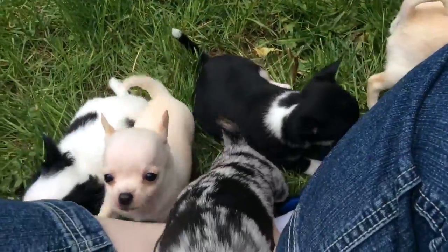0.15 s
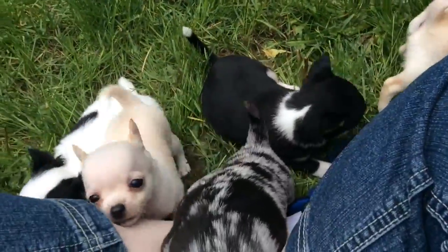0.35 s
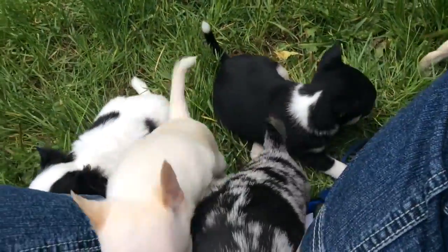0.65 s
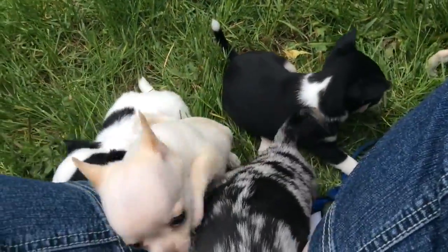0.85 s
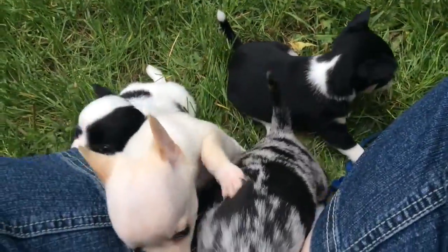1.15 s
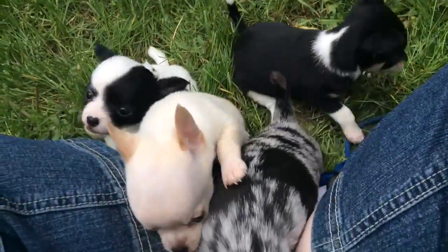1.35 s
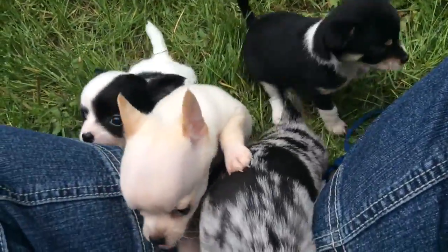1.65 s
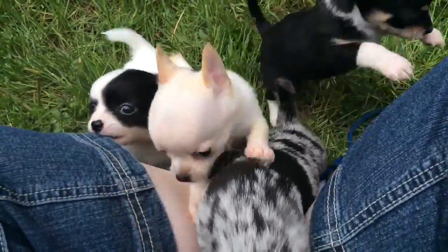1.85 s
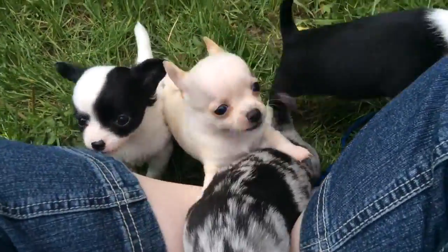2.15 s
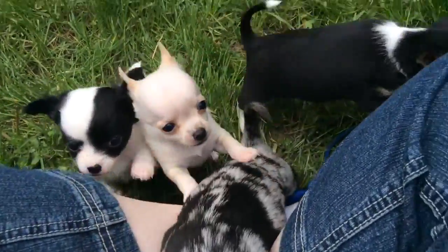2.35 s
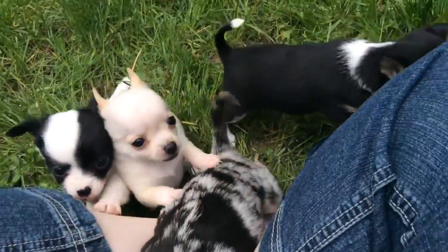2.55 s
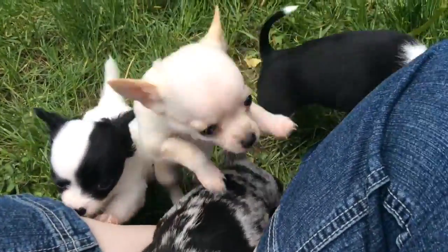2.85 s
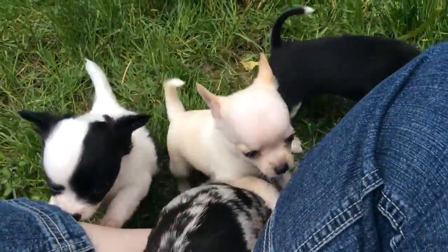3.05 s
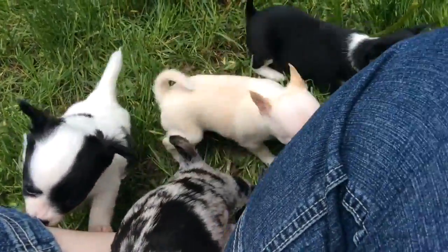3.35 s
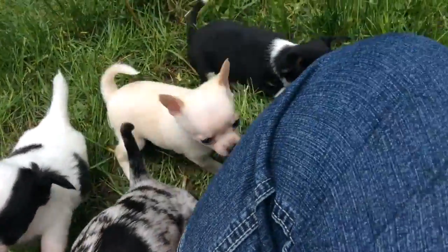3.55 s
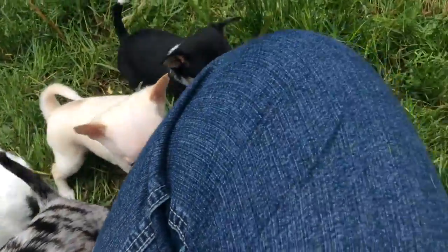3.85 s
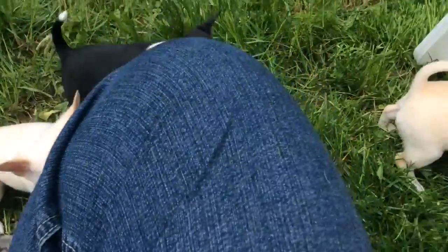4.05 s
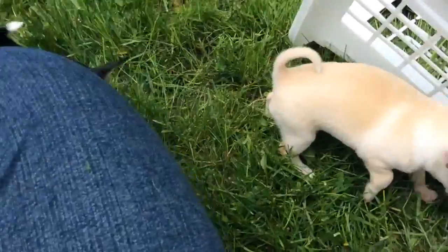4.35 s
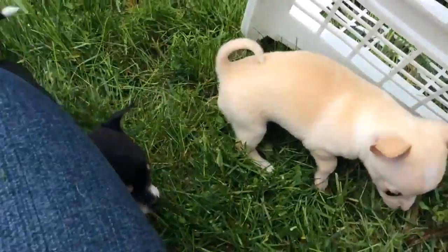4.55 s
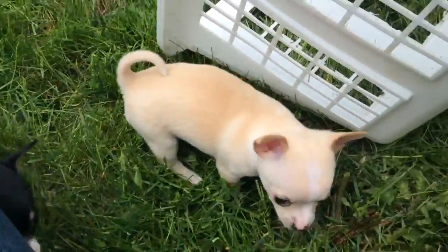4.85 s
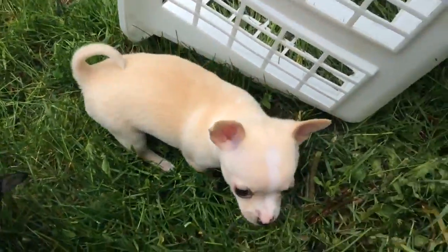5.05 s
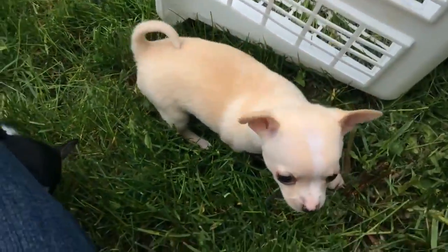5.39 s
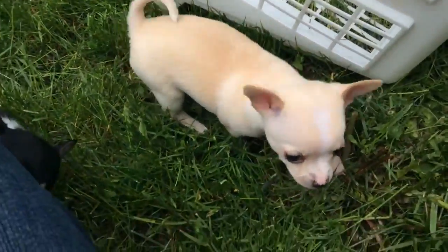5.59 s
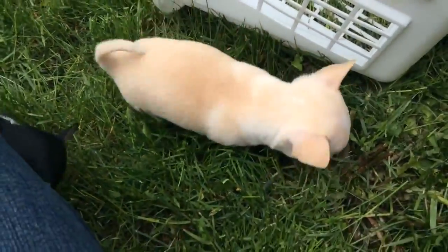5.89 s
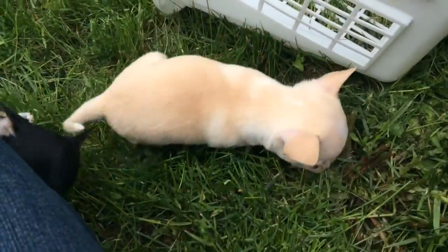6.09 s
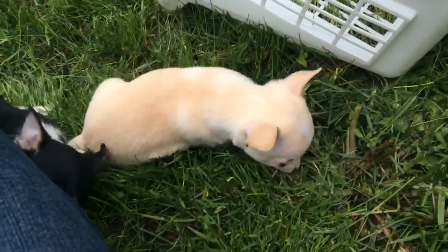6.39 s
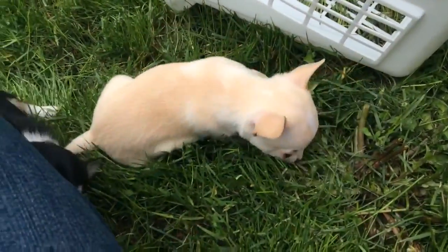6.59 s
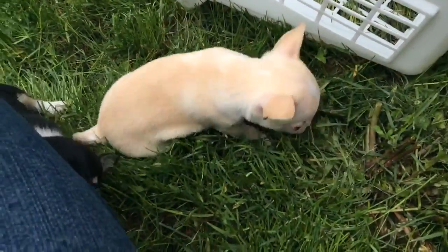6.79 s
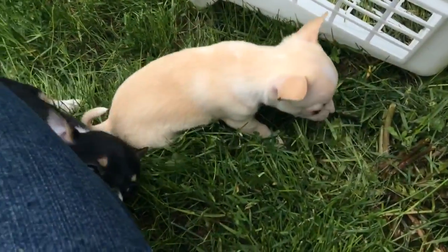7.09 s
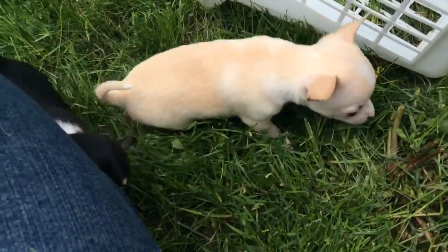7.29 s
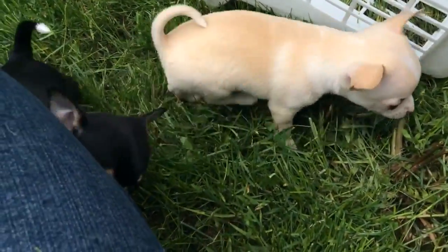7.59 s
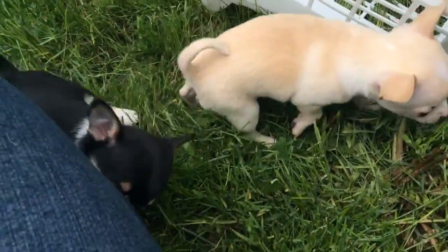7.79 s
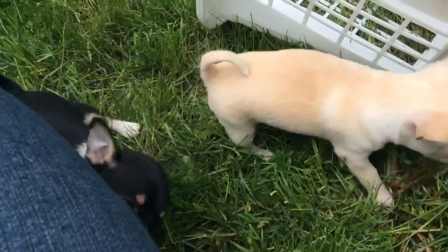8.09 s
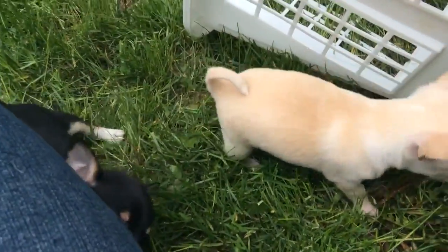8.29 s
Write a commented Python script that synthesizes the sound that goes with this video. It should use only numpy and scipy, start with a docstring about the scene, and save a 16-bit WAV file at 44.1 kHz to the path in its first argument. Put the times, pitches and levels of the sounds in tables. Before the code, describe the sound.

Distant songbirds chirp over a quiet traffic rumble and a faint machine whine while puppies step about in the grass near the microphone. About two seconds in, one gives a brief high yelp, followed by a longer falling yelp with a hoarse ending. After that come only light paw rustles, tiny ticks, faint sniffing, one soft bump and more far birdsong.

```python
"""Small puppies on a lawn, near one microphone: one gives a short rising yelp, then a longer one that
falls and breaks into a croak as its vocal folds beat strong and weak in turn. They sniff and climb
about, paws swishing and claws ticking in the grass, and an insect clicks. Songbirds whistle and trill
from trees a way off; far traffic rumbles under a faint machine whine."""
import sys
import numpy as np
from scipy import signal
from scipy.fft import rfft, irfft, next_fast_len
from scipy.io import wavfile
from scipy.ndimage import uniform_filter1d

SR = 44100
rng = np.random.default_rng(int(sys.argv[2]) if len(sys.argv) > 2 else 0)


def unload_audio(sound):
    """Save the sound as a 16-bit wav file, at the path given as the first command line argument."""
    columns = np.transpose(np.atleast_2d(sound))
    # keep every value between -1 and 1, then stretch to whole-number steps
    steps = np.round(np.clip(columns, -1, 1) * 32767)
    wavfile.write(sys.argv[1], SR, steps.astype(np.int16))


N = 371763
T = np.arange(N) / SR


def amp(db):
    """Decibels to gain."""
    return 10 ** (np.asarray(db) / 20)


def rms_one(x):
    """Scale to unit rms."""
    return x / np.sqrt(np.mean(x ** 2) + 1e-20)


def phase(hz):
    """Running phase of a moving pitch, in radians."""
    return 2 * np.pi * np.cumsum(hz) / SR


def in_time(rows, t=T):
    """Columns of a curve table read at times t."""
    time_s, *columns = np.transpose(rows)
    return [np.interp(t, time_s, column) for column in columns]


def at_hz(spectrum, hz):
    """A spectrum's level in dB, read on a log-frequency axis."""
    points_hz, level_db = np.transpose(spectrum)
    return np.interp(np.log(hz + 1), np.log(points_hz), level_db)


def window(start, end, fade_s=0.0014):
    """Sample range of a stretch and its soft-edged gate."""
    at = np.arange(int(start * SR), min(int(end * SR), N))
    return at, np.clip(np.minimum(T[at] - start, end - T[at]) / fade_s, 0, 1)


def drift(rate_hz):
    """Smooth random wander with a spread of 1."""
    hop = 40
    r = np.exp(-2 * np.pi * rate_hz * hop / SR)
    slow = signal.lfilter([1], [1, -2 * r, r * r], rng.standard_normal(N // hop + 2002))[2000:]
    return np.interp(np.arange(N) / hop, np.arange(len(slow)), rms_one(slow))


def coloured(x, spectrum):
    """A signal shaped to a spectrum, rms 1."""
    size = next_fast_len(N)
    gain = amp(at_hz(spectrum, np.arange(size // 2 + 1) * SR / size))
    return rms_one(irfft(rfft(x, size) * gain, size)[:N])


def resonance(x, hz, width_hz):
    """Two-pole peak with gain 1 on top."""
    r = np.exp(-np.pi * width_hz / SR)
    poles = [1, -2 * r * np.cos(2 * np.pi * hz / SR), r * r]
    return signal.lfilter(np.array([1, 0, -1]) * (1 - r * r) / 2, poles, x)


def narrow_noise(hz, width_hz):
    """Noise passed twice through one resonance, rms 1."""
    return rms_one(resonance(resonance(rng.standard_normal(N), hz, width_hz), hz, width_hz))


def swells(rows, rise_s, fall_s):
    """Gain curves, one a level column: a soft rise to each event's peak and a dying fall."""
    peak_s, *columns = np.transpose(rows)
    t = T[::50]
    late = t[:, None] - peak_s
    shape = np.exp(-np.where(late < 0, (late / rise_s) ** 2, late / fall_s))
    return [np.interp(T, t, shape @ amp(db)) for db in columns]


def open_air(level_db=-66.5):
    """A broad outdoor hiss behind everything."""
    # colour of the hiss: frequency_hz, level_db
    spectrum = [(150, -15.5), (250, -2), (449, -14.5), (690, -7.5), (792, -10), (1180, -12), (1240, -11),
                (1420, -13), (1780, -17), (3300, -20), (7170, -27.5), (8370, -23.5), (15300, -42.5)]
    return amp(level_db + .5 * drift(4.3)) * coloured(rng.standard_normal(N), spectrum)


def far_traffic():
    """A slowly swelling rumble with the hum of a far engine's low orders."""
    # swell of the rumble: time_s, level_db
    swell = [(0, -59.5), (2.1, -58), (3.0, -57), (3.78, -54), (4.08, -60.5), (4.41, -54), (4.67, -64),
             (4.95, -58.5), (5.4, -57), (5.7, -56), (6.2, -56), (7.84, -55), (8.43, -57)]
    # colour of the rumble: frequency_hz, level_db
    spectrum = [(11, -56), (18, -23.5), (53, -2.5), (83, 0), (118, -0.5), (147, -5.5), (184, -11.5),
                (217, -6), (243, -18), (343, -15), (500, -25.5), (650, -68), (1100, -120)]
    # engine orders: pitch_hz, width_hz, level_db
    hums = [(68.8, 16.7, -62.5), (142.4, 16.3, -69.5)]
    out = amp(in_time(swell)[0] + 0.61 * drift(6.0)) * coloured(rng.standard_normal(N), spectrum)
    for hz, width_hz, db in hums:
        out += amp(db) * rms_one(resonance(rng.standard_normal(N), hz, width_hz))
    return out


def machine_whine(idle_db=-88):
    """A distant machine's two narrow whines surge and never quite stop."""
    # lower and upper whine: pitch_hz, width_hz
    whines = [(1162, 28), (1430, 180)]
    # surges: peak_s, lower_db, upper_db
    surges = [(.28, -75, -88), (1.07, -75, -97), (1.74, -74, -82.5), (2.38, -73, -79), (2.95, -67, -75),
              (3.72, -72.5, -72), (4.45, -77, -71), (4.85, -98, -81), (5.2, -74, -75), (5.7, -78, -86),
              (5.95, -79, -77), (6.63, -70, -76), (7.45, -72, -76), (7.9, -81, -77), (8.35, -76, -69)]
    out = np.zeros(N)
    for (hz, width_hz), surge in zip(whines, swells(surges, rise_s=.17, fall_s=.15)):
        out += (surge + amp(idle_db)) * amp(1.4 * drift(7.3)) * narrow_noise(hz, width_hz)
    return out


def far_moan():
    """A short wavering tone from far off."""
    # course of the tone: time_s, pitch_hz, level_db
    course = [(1.3, 680, -87), (1.35, 680, -72), (1.574, 689, -74), (1.62, 700, -80)]
    at, gate = window(course[0][0], course[-1][0], fade_s=.02)
    hz, db = in_time(course, T[at])
    out = np.zeros(N)
    out[at] = gate * np.sqrt(2) * amp(db) * np.sin(phase(hz * (1 + 0.018 * drift(31)[at])))
    return out


def far_chorus():
    """The whistles of many distant small birds merge into flickering narrow noise."""
    # strength of the chorus: time_s, level_db
    strength = [(5.4, -84), (7.0, -85), (8.15, -83)]
    at, gate = window(strength[0][0], strength[-1][0], fade_s=0.076)
    level_db = in_time(strength, T[at])[0] + 2.5 * drift(13)[at]
    out = np.zeros(N)
    out[at] = gate * amp(level_db) * narrow_noise(3360, width_hz=290)[at]
    return out


def whistles(notes, depth_hz, warble_hz=70.5):
    """Each bird note glides through three pitches, swells and fades, with a quick warble."""
    out, waver = np.zeros(N), 0.85 * drift(41.6)
    for start, end, first_hz, middle_hz, last_hz, db in notes:
        at, gate = window(start, end, fade_s=0.0029)
        progress = (T[at] - start) / (end - start)
        glide_hz = np.interp(progress, [0, .5, 1], [first_hz, middle_hz, last_hz])
        warble = np.sin(2 * np.pi * warble_hz * T[at]) + waver[at]
        swell_db = np.interp(progress, [0, 0.38, 1], [-4.5, 0, -3])
        out[at] += gate * np.sqrt(2) * amp(db + swell_db) * np.sin(phase(glide_hz + depth_hz * warble))
    return out


def trills(rate_hz=114.3):
    """A bird's whistle swept up and down so fast that it buzzes."""
    # buzzy calls: start_s, end_s, first_hz, last_hz, depth_hz, level_db
    calls = [(0.388, 0.546, 3890, 4520, 690, -66), (.64, 0.708, 2990, 2850, 500, -62.5),
             (0.7, 0.876, 5400, 6200, 1000, -73), (1.705, 1.838, 4090, 4520, 500, -72),
             (1.95, 2.064, 3700, 3346, 570, -59.5), (3.203, 3.394, 3066, 3570, 795, -65.5),
             (4.079, 4.329, 3224, 3266, 510, -68.5), (4.943, 5.205, 4020, 4260, 597, -67),
             (5.222, 5.335, 3300, 3140, 696, -66), (8.18, 8.288, 4250, 4280, 250, -69),
             (8.201, 8.342, 3070, 3150, 220, -64.5), (8.319, 8.412, 2980, 2640, 350, -64.5),
             (1.858, 1.96, 2620, 2530, 220, -67)]
    out, sweep = np.zeros(N), np.sin(phase(rate_hz * (1 + .25 * drift(40))))
    for start, end, first_hz, last_hz, depth_hz, db in calls:
        at, gate = window(start, end, fade_s=0.018)
        hz = np.linspace(first_hz, last_hz, len(at)) + depth_hz * sweep[at]
        out[at] += gate * amp(db) * np.sin(phase(hz))
    return out


def songbirds(trees_t60_s=0.7, trees_db=-2.5):
    """Whistles and trills from a way off, smeared by scattering among the trees."""
    # whistled notes: start_s, end_s, first_hz, middle_hz, last_hz, level_db
    song = [(.2, .27, 3700, 3840, 3820, -76.5), (.33, .36, 3620, 3630, 3500, -70.5),
            (.375, .44, 3340, 3570, 4080, -66), (.51, .6, 2720, 2515, 2650, -68.5),
            (.6, .64, 2750, 3300, 3560, -59), (.64, .7, 3515, 3480, 3500, -61.5),
            (.725, .8, 3500, 2630, 2450, -63.5), (.81, .87, 2570, 2640, 2630, -70),
            (1.7, 1.78, 3730, 4450, 4460, -74), (1.79, 1.94, 2840, 2780, 2570, -68.5),
            (1.95, 1.995, 4190, 3720, 3530, -61), (2.01, 2.06, 3820, 3640, 3440, -67),
            (4.06, 4.15, 2950, 3680, 3070, -67.5), (4.169, 4.185, 3100, 3030, 2900, -53.5),
            (4.89, 4.94, 3580, 3540, 3500, -64), (4.945, 4.98, 4800, 4650, 4340, -64.5),
            (5.0, 5.04, 3860, 3850, 3770, -67), (5.036, 5.09, 3740, 3650, 3660, -62),
            (5.105, 5.15, 4900, 4640, 4370, -70), (5.155, 5.2, 2740, 2550, 2440, -61.5),
            (5.205, 5.228, 2500, 2700, 3250, -60), (5.238, 5.277, 4130, 4180, 4270, -68),
            (5.28, 5.31, 2650, 2370, 2150, -67.5), (5.32, 5.35, 2930, 2920, 2890, -72),
            (5.55, 5.58, 2020, 2120, 2146, -71), (8.18, 8.21, 3720, 3210, 3000, -67),
            (8.402, 8.418, 3440, 3500, 3800, -54.5), (8.417, 8.43, 4050, 4200, 4260, -65)]
    # a smaller bird's thin falling notes: start_s, end_s, first_hz, middle_hz, last_hz, level_db
    peeps = [(.25, .31, 7430, 6750, 6370, -82), (.38, .48, 7900, 7460, 6240, -75),
             (.54, .66, 8300, 7740, 6150, -74)]
    direct = whistles(song, depth_hz=61.4) + whistles(peeps, depth_hz=17) + trills()
    direct *= amp(2.6 * drift(45))    # moving leaves and air make the level flutter
    lag = T[:SR // 2]
    scatter = rng.standard_normal(len(lag)) * amp(-60 * lag / trees_t60_s) * np.clip(lag / 0.01, 0, 1)
    return direct + amp(trees_db) * signal.fftconvolve(direct, scatter / np.linalg.norm(scatter))[:N]


def insect(clicks_per_s=22.5):
    """A steady train of tiny clicks rings two high resonances."""
    # strength of the ticking: time_s, level_db
    strength = [(4.4, -90.5), (5.9, -81.5), (8.4, -85)]
    # resonances: pitch_hz, width_hz, level_db
    modes = [(10040, 200, -5), (6030, 210, -3)]
    at, gate = window(strength[0][0], strength[-1][0], fade_s=.1)
    count = np.floor(np.cumsum(clicks_per_s * (1 + 0.066 * drift(3.9))) / SR)
    clicks = np.diff(count, prepend=0) * amp(4.8 * drift(30))
    rings = sum(amp(db) * rms_one(resonance(clicks + 1e-18, hz, width_hz)) for hz, width_hz, db in modes)
    out = np.zeros(N)
    out[at] = gate * amp(in_time(strength, T[at])[0]) * rings[at]
    return out


def stalk_snaps(uneven_db, per_s=9000):
    """Grass stalks snap at random in tiny clicks of uneven size."""
    snapping = rng.random(N) < per_s / SR
    size = amp(uneven_db * np.minimum(rng.exponential(1, N), 5.0))
    return snapping * size * rng.choice([-1, 1], N)


def paws_in_grass():
    """Dense snaps of stalks blur into a bright swish and a dull brush that swell at each step."""
    # steady stirring of the grass: time_s, level_db
    rustle = [(0, -87), (1.4, -86.5), (2.1, -82.5), (2.8, -83.5), (3.3, -76), (3.9, -80), (4.5, -77),
              (5.6, -82), (5.95, -79), (6.35, -83), (6.7, -78), (7.05, -84), (7.35, -78), (7.7, -81.5),
              (8.43, -79)]
    # paw strokes: peak_s, swish_db, brush_db
    steps = [(.44, -84, -75), (.63, -80, -73), (.85, -79, -81), (.96, -86, -73.5), (1.5, -83, -73.5),
             (1.57, -79, -77), (1.96, -89, -79), (2.24, -80, -76), (2.32, -78, -90), (2.43, -81, -79),
             (2.67, -88, -76), (3.8, -85, -81), (3.89, -78.5, -85), (4.25, -77, -76.5), (4.7, -83, -82),
             (4.9, -82, -93), (5.08, -89, -72), (5.41, -88, -83), (5.97, -79, -75), (6.56, -81, -87),
             (6.64, -83, -78), (7.16, -89, -87), (7.37, -78, -73), (7.87, -75, -81), (8.14, -79, -78),
             (8.36, -82, -80)]
    # colour of the swish: frequency_hz, level_db
    swish_spectrum = [(4000, -14), (7000, -7), (9200, 4), (11000, -0.5), (14000, -8.5), (15300, -6)]
    # colour of the brush: frequency_hz, level_db
    brush_spectrum = [(1200, -18), (2500, -2.5), (4500, 1), (6300, -3.5), (7300, -10.5), (9000, -30)]
    stirring = amp(in_time(rustle)[0])
    bright, dull = swells(steps, rise_s=0.022, fall_s=0.035)
    swish = amp(2.0 * drift(25)) * coloured(stalk_snaps(uneven_db=3.3), swish_spectrum)
    brush = amp(2.76 * drift(28)) * coloured(stalk_snaps(uneven_db=3.0), brush_spectrum)
    return (stirring + bright) * swish + (stirring * amp(1) + dull) * brush


def knocks(contacts, ring_cycles, noisiness, samples=600):
    """Each contact is a brief noise burst that dies fast, partly ringing at its pitch."""
    out, t = np.zeros(N + samples), T[:samples]
    for start, db, hz in contacts:
        decay = amp(-60 * t * hz / ring_cycles)
        burst = (np.sin(2 * np.pi * hz * t) + noisiness * rng.standard_normal(samples)) * decay
        out[round(start * SR):][:samples] += amp(db) * burst / np.abs(burst).max()
    return out[:N]


def ticks_and_bump():
    """Claws and grass stalks tick sharply, and there is one soft, low bump."""
    # claws and stalks: start_s, peak_db, pitch_hz
    ticks = [(0.3641, -51, 8100), (1.5656, -44, 8530), (1.9594, -48.5, 8400), (2.3131, -63, 5700),
             (2.4234, -47, 9440), (2.7237, -54, 9160), (3.2071, -43, 10900), (3.5324, -54, 8600),
             (3.58, -50, 9400), (3.8023, -50, 9230), (3.88, -45, 8700), (4.6194, -57, 4540),
             (4.9018, -52, 8490), (5.3894, -54, 5340), (5.7962, -58, 6470), (7.2434, -57, 8470),
             (8.2484, -58, 6320), (8.2686, -52, 6200), (8.331, -58, 6090), (8.362, -46.5, 10200),
             (0.3087, -58, 2650), (0.6214, -47, 3420), (1.6337, -57, 2060), (3.4615, -50.5, 3100),
             (3.6556, -54, 2900)]
    # the bump: start_s, peak_db, pitch_hz
    bump = [(4.353, -43.5, 343)]
    return knocks(ticks, ring_cycles=36, noisiness=0.32) + knocks(bump, ring_cycles=9.4, noisiness=0.15)


def squeak():
    """One short falling tone near the top of hearing."""
    # course of the squeak: time_s, pitch_hz, level_db
    course = [(2.67, 14600, -79), (2.677, 14200, -56), (2.684, 13700, -58), (2.687, 13500, -79)]
    hz, db = in_time(course)
    return amp(db) * (db > -79) * np.sqrt(2) * np.sin(phase(hz))


def sniffs():
    """Air whistles softly in the puppies' nostrils."""
    # breaths: peak_s, level_db
    breaths = [(.44, -80), (.63, -75), (.96, -79), (1.5, -75), (2.05, -79), (2.43, -82), (2.64, -75),
               (3.24, -83), (3.79, -78), (4.64, -78), (4.9, -83), (5.41, -76), (5.7, -79), (5.97, -77),
               (6.64, -78), (7.26, -75), (7.87, -77), (8.14, -81)]
    return swells(breaths, rise_s=0.034, fall_s=0.06)[0] * narrow_noise(8100, width_hz=520)


def wheeze(half_width_hz=1200):
    """Air noise around a moving throat resonance as the long yelp tires."""
    # course of the resonance: time_s, centre_hz, level_db
    course = [(2.99, 3600, -65), (3.03, 4410, -66), (3.079, 5120, -60), (3.11, 4800, -64),
              (3.13, 4200, -75)]
    at, gate = window(course[0][0], course[-1][0])
    hz, db = in_time(course, T[at])
    lowpass = signal.butter(4, half_width_hz, fs=SR, output="sos")
    slow = signal.sosfilt(lowpass, rng.standard_normal((2, len(at))))
    turn, out = phase(hz), np.zeros(N)
    out[at] = gate * amp(db) * rms_one(slow[0] * np.sin(turn) + slow[1] * np.cos(turn))
    return out


def hoarseness():
    """Uneven fold beats heard as lumpy noise in the throat, and one rough puff of breath after the first yelp."""
    # hoarse moments of the yelps, and a puff of breath just after the first: start_s, end_s, level_db
    moments = [(2.063, 2.096, -49), (2.142, 2.16, -55), (2.864, 2.893, -66), (3.128, 3.156, -51.5),
               (3.155, 3.209, -53.5), (2.22, 2.25, -58)]
    # colour of the rasp: frequency_hz, level_db
    spectrum = [(500, -8.5), (1200, 6.5), (1900, -7.5), (2700, -3), (4000, -16.5), (5500, -23), (9000, -33),
                (13000, -50)]
    rasp = coloured(rng.standard_normal(N), spectrum) * amp(2.5 * drift(230))
    out = np.zeros(N)
    for start, end, db in moments:
        at, gate = window(start, end, fade_s=0.0029)
        out[at] += gate * amp(db) * rasp[at]
    return out


def croak(wobble=0.027):
    """The folds beat strong and weak in turn, so partials stand at every half multiple of the pitch."""
    # course of the croak: time_s, pitch_hz, level_db
    course = [(3.129, 499, -43), (3.153, 392, -41), (3.165, 395, -38), (3.19, 418, -40.5),
              (3.214, 496, -41.5)]
    # its partials: pitch_multiple, level_db
    partials = [(0.5, -19), (1, 2.5), (1.5, -7), (2, -1), (2.5, -7.5), (3, -1), (3.5, -22), (4, -27),
                (4.5, -35), (5, -38), (5.5, -38), (6, -18), (6.5, -33), (7, -20), (7.5, -39), (8, -39)]
    at, gate = window(course[0][0], course[-1][0], fade_s=0.0053)
    hz, level_db = in_time(course, T[at])
    turn, out = phase(hz * (1 + wobble * drift(100)[at])), np.zeros(N)
    voice = sum(amp(db) * np.sin(k * turn + k * k) for k, db in partials)
    out[at] = gate * amp(level_db) * rms_one(voice)
    return out


def yelps(wobble=0.0078, slack_below_hz=900, slack_db_per_hz=.05):
    """A puppy's steady fold beats: a stack of sines coloured by mouth and throat, with breath on top."""
    # one list a clear stretch: time_s, pitch_hz, fundamental_db, mouth_open_db, shrill_db, breath_db
    stretches = [
        [(2.065, 916, -41.5, -20, -75, -73), (2.084, 835, -40.5, -4, -77, -75),
         (2.104, 918, -38.5, -11, -72, -60), (2.118, 900, -43.5, -4, -76, -64),
         (2.136, 930, -50.5, -1.5, -78, -71), (2.15, 988, -39, -10, -67, -72),
         (2.164, 982, -38.5, -5, -66, -65), (2.18, 1047, -36, -5, -72, -69), (2.194, 1100, -38, -11, -68, -68),
         (2.199, 1160, -40, -15, -70, -72), (2.204, 1290, -52, -20, -74, -78)],
        [(2.849, 1400, -36, -15, -53, -67), (2.856, 1292, -32, -11, -49.5, -66),
         (2.867, 1300, -32.5, -9, -47, -64), (2.882, 1355, -33, -8, -54, -63),
         (2.897, 1362, -34.5, -6, -51, -60), (2.912, 1338, -33.5, -9, -49.5, -61),
         (2.928, 1260, -31, -12.5, -50, -60), (2.955, 1141, -31.5, -6.5, -54, -60),
         (2.97, 1098, -30.5, -14, -55, -67), (2.985, 1026, -29, -19.5, -58.5, -74),
         (3.0, 951, -36, -15, -58, -77), (3.015, 901, -38.5, -19, -59, -80), (3.03, 871, -40, -23, -63.5, -68),
         (3.06, 857, -39, -12, -67, -82), (3.09, 895, -38.5, -12.5, -68, -79),
         (3.106, 827, -41, -6.5, -74, -81), (3.121, 846, -40, -7, -67, -75), (3.134, 728, -41, -7, -60, -74),
         (3.145, 716, -42, -10, -58, -75)],
        [(3.21, 800, -40, -30, -68, -70), (3.216, 854, -40.5, -27, -72, -77), (3.228, 897, -57, -7, -76, -80)],
    ]
    # the folds' own harmonics 2-4: pitch_multiple, level_db
    fold_harmonics = [(2, 0), (3, -7.5), (4, -21)]
    # mouth response, on harmonics 2-4: frequency_hz, gain_db
    mouth = [(1450, 8.5), (1700, -5.5), (1900, 4.5), (2050, -4), (2250, -1.5), (2650, 6.5), (2950, -4),
             (3400, 4.5), (3700, 3.5), (4000, -9.5), (4500, -22), (5200, 2)]
    # throat response, on harmonics 5-16: frequency_hz, gain_db
    throat = [(3500, -24), (5400, -8.5), (6800, -18.5), (8200, -5), (9300, 1.5), (10300, -38), (11500, -22),
              (12800, -3), (14000, -18), (15000, -32)]
    # air past the folds: frequency_hz, level_db
    breath_spectrum = [(3500, -28), (5500, -10), (7300, -20), (8300, 4), (9500, -5), (10700, -11),
                       (12000, -5), (13800, -3), (15300, -17)]
    out, breath = np.zeros(N), coloured(rng.standard_normal(N), breath_spectrum)
    unsteady = 1 + wobble * drift(120)
    shimmer = amp(0.78 * drift(64))    # no two beats are quite as strong
    ragged = 0.046 * drift(350)    # the folds close a little early or late, blurring the top harmonics
    for rows in stretches:
        at, gate = window(rows[0][0], rows[-1][0])
        curves = uniform_filter1d(in_time(rows, T[at]), size=130, axis=1)    # muscles move smoothly
        hz, fundamental_db, mouth_open_db, shrill_db, breath_db = curves
        turn = phase(hz * unsteady[at])
        vowel = sum(amp(at_hz(mouth, k * hz) + db) * np.sin(k * turn) for k, db in fold_harmonics)
        low = amp(fundamental_db) * (np.sin(turn) + amp(mouth_open_db) * vowel)
        shrill = sum(amp(at_hz(throat, k * hz) - 3.0 * max(k - 9, 0))
                     * np.sin(k * (turn + ragged[at]) + k * k) for k in range(5, 17))
        slack_db = slack_db_per_hz * np.maximum(slack_below_hz - hz, 0)    # slack folds close softly
        voice = np.sqrt(2) * (low + amp(shrill_db - slack_db) * shrill)
        puffs = amp(breath_db) * (1 + .5 * np.sin(turn))    # air escapes with each opening
        out[at] += gate * shimmer[at] * (voice + puffs * breath[at])
    return out


def scene():
    """Distance, trees, lawn and puppy reach one microphone, the same on both channels."""
    puppy = yelps() + croak() + hoarseness() + wheeze()
    lawn = paws_in_grass() + ticks_and_bump() + sniffs() + squeak() + insect()
    trees = songbirds() + far_chorus()
    distance = open_air() + far_traffic() + machine_whine() + far_moan()
    return np.tile(distance + trees + lawn + puppy, (2, 1))


def record(dry, cutoff_hz=15430):
    """The top of the treble is cut steeply."""
    return signal.sosfilt(signal.ellip(14, .2, 60, cutoff_hz, fs=SR, output="sos"), dry)


dry = scene()
out = record(dry)
unload_audio(out)
```